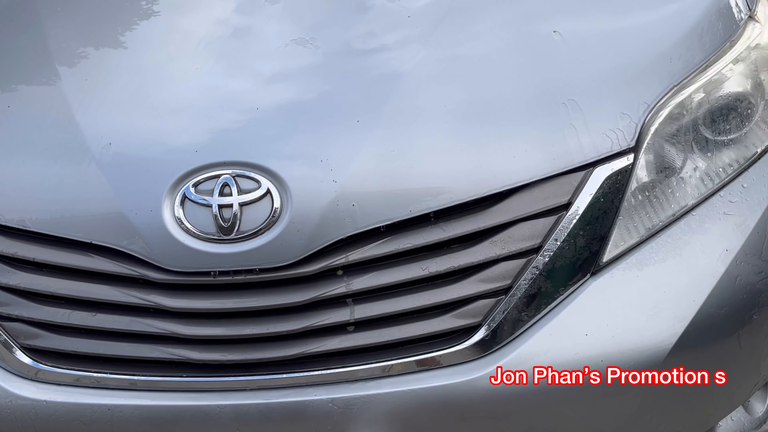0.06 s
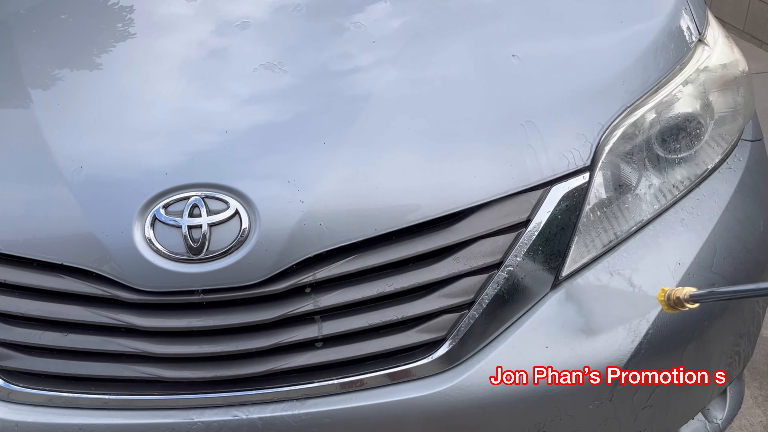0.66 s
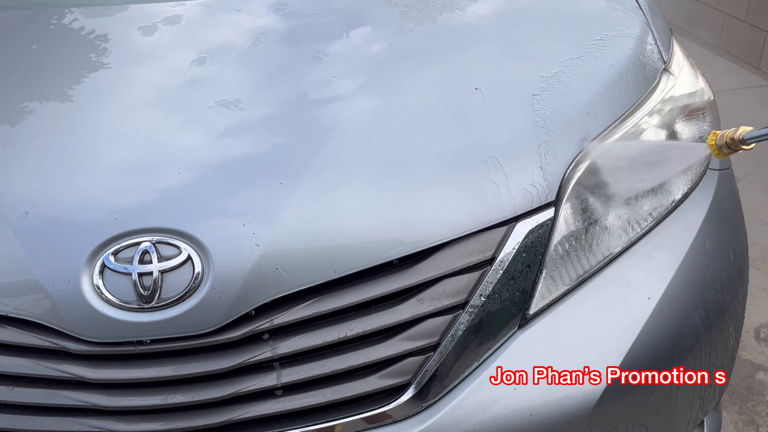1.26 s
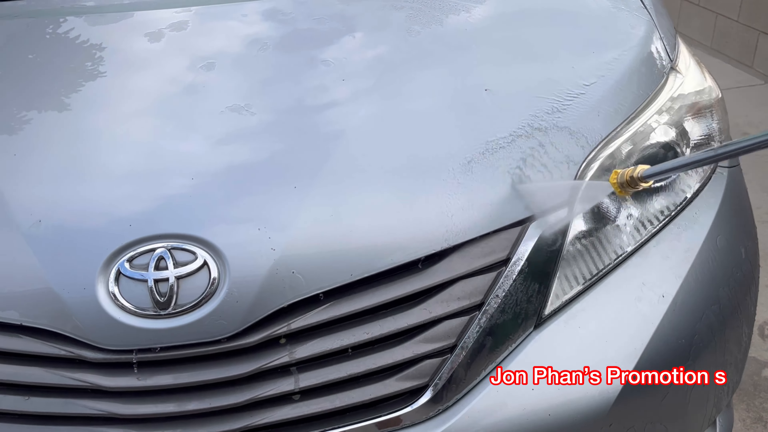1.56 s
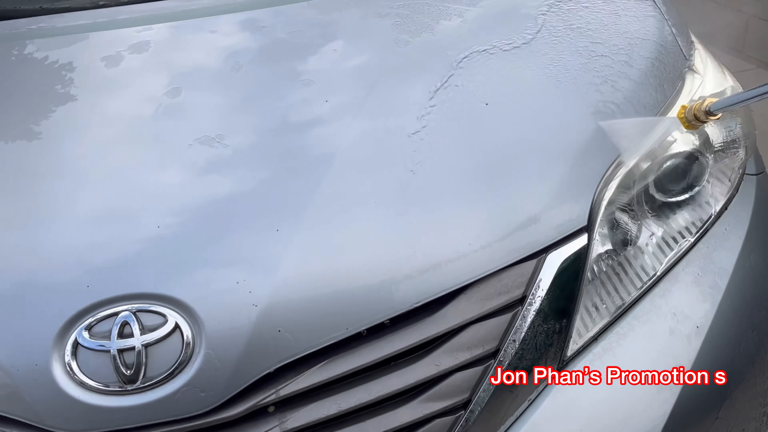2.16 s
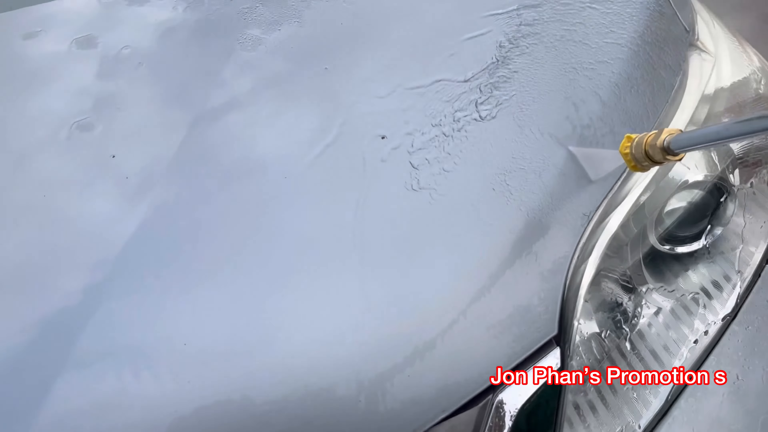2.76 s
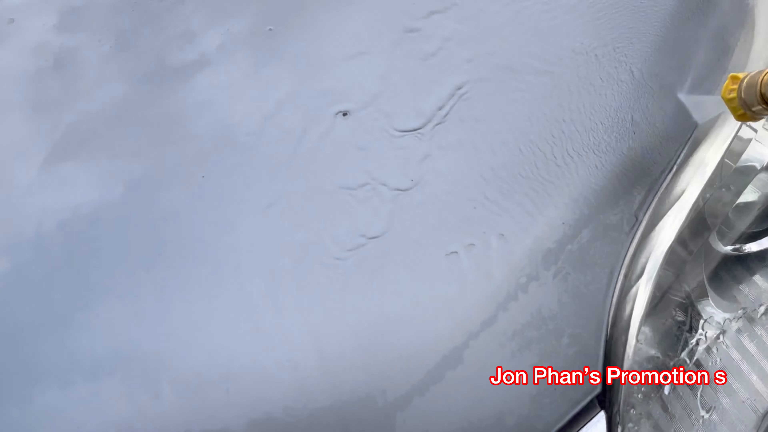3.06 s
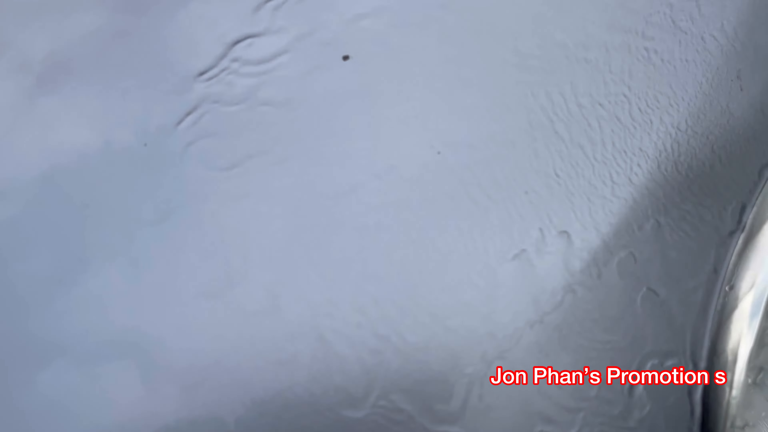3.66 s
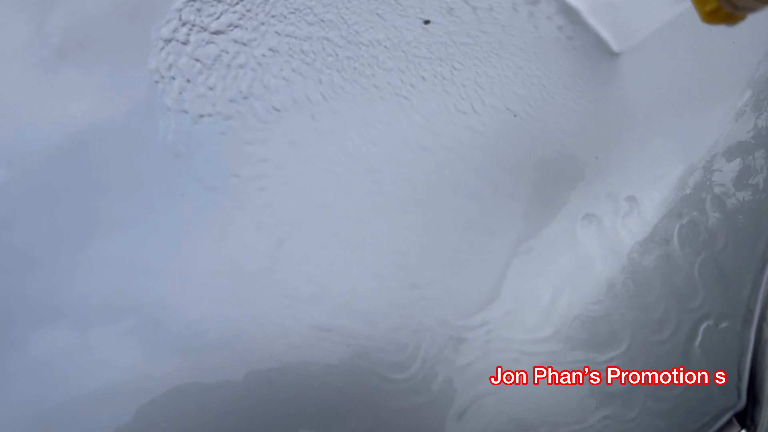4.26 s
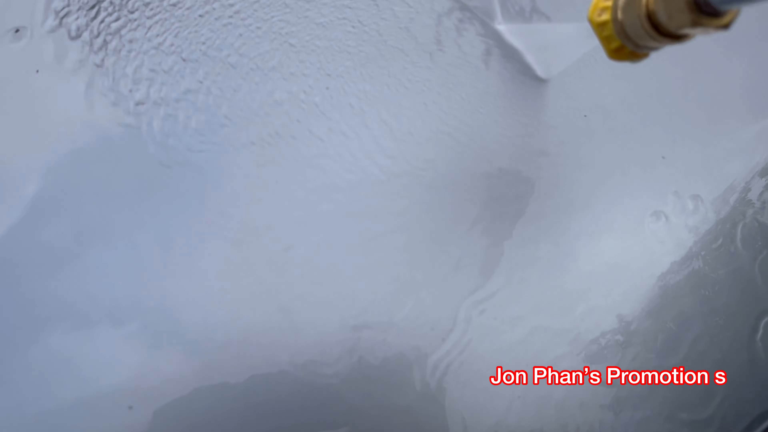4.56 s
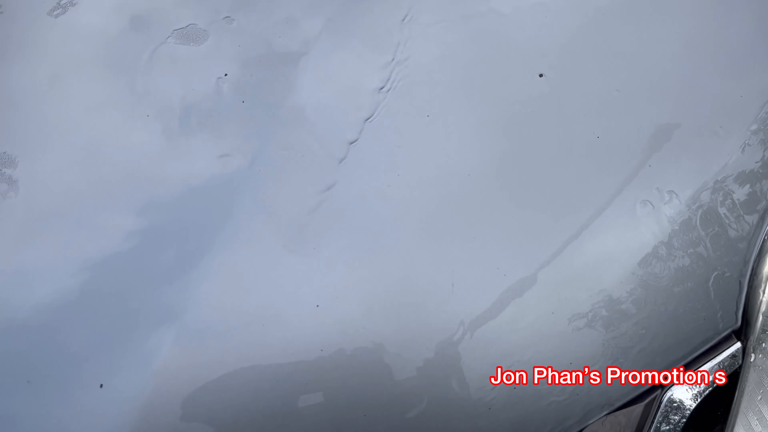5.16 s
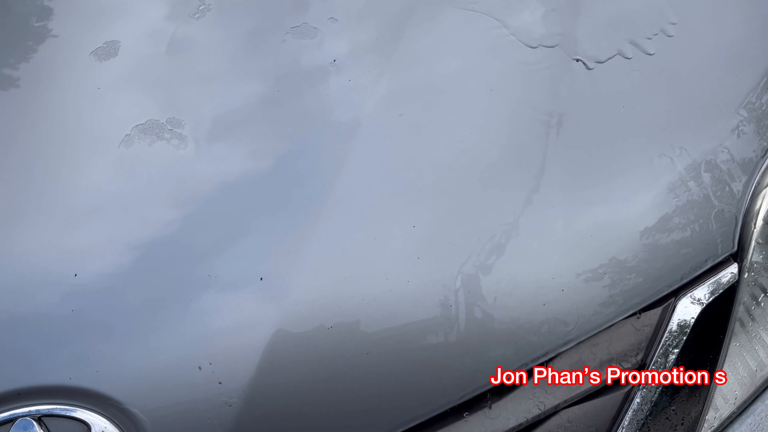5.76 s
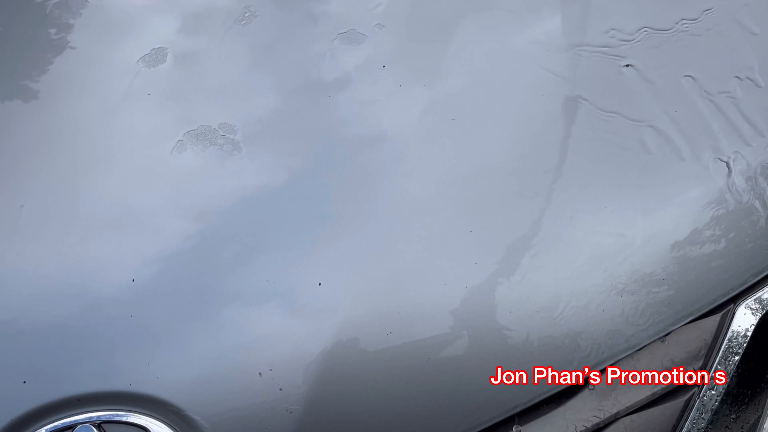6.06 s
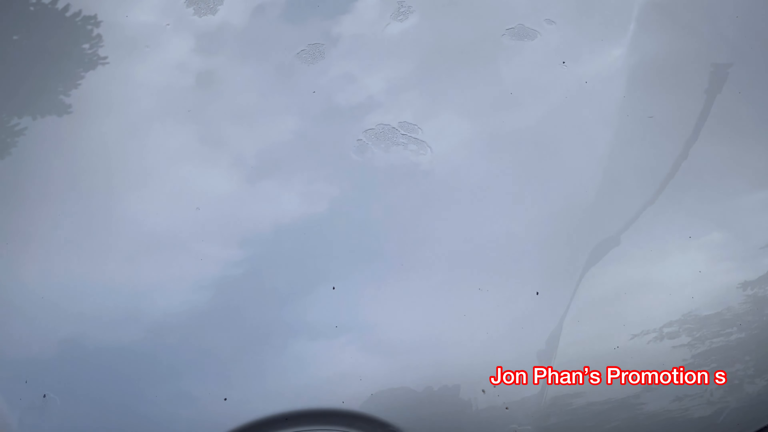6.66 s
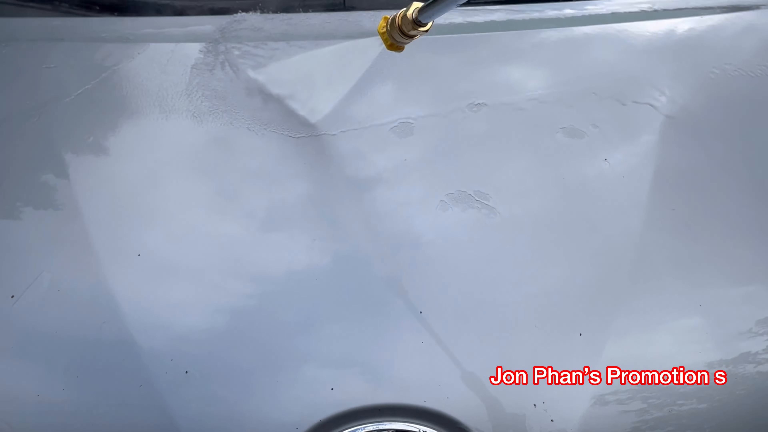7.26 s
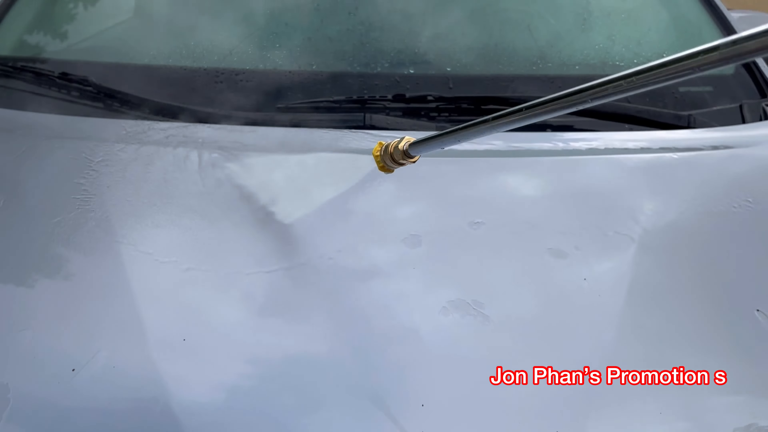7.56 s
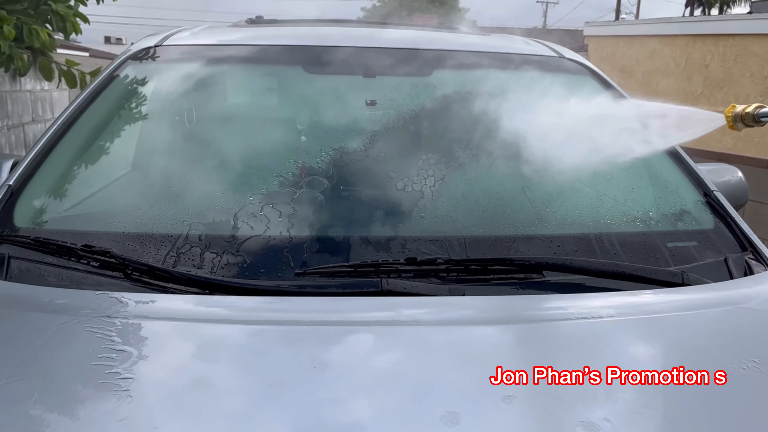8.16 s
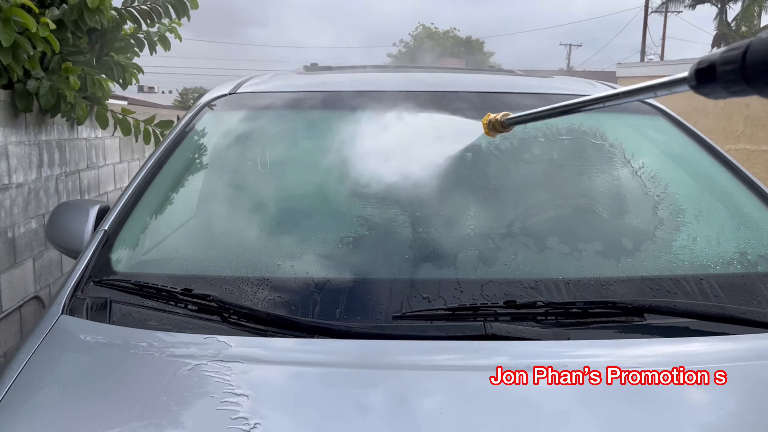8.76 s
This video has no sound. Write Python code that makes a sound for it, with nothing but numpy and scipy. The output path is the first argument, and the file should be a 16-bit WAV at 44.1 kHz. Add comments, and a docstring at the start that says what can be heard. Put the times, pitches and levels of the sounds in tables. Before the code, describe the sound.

Close, hissing water spray sweeps over a car, spattering and rumbling on the bodywork while the pressure washer's motor hums steadily.

```python
"""A pressure washer's jet rinses a car outdoors, sweeping bumper, headlamp, bonnet and windscreen.
The nozzle hisses louder the nearer it comes to a hand-held microphone; the water tears into mist,
spatters on the paint and swishes off rims. Drops drum on each part crossed, and the shell rumbles,
thumps and booms once. A few metres away an electric motor hums, driving a three-piston pump."""
import sys
import numpy as np
from scipy import signal
from scipy.fft import rfft, irfft, next_fast_len
from scipy.io import wavfile
from scipy.ndimage import uniform_filter1d, map_coordinates

SR = 44100
rng = np.random.default_rng(int(sys.argv[2]) if len(sys.argv) > 2 else 0)


def log_audio(samples):
    """Write samples as a 16-bit WAV file to the path given in sys.argv[1]."""
    # one column per channel
    frames = np.atleast_2d(samples).T
    # limit to full scale, then quantise
    limited = np.clip(frames, -1, 1)
    pcm = np.round(limited * 32767).astype(np.int16)
    wavfile.write(sys.argv[1], SR, pcm)


N = 396880

# nozzle to microphone: time_s, distance_m
NOZZLE_DISTANCE = [(0, 0.59), (.75, 0.52), (1.05, 0.64), (2.05, 0.57), (2.52, 0.47), (2.67, 0.37),
                   (4.18, 0.28), (4.73, 0.3), (4.93, 0.53), (6.69, 0.74), (7.05, 0.53), (8.25, 0.95),
                   (9, 1.07)]
# spatter band, brighter the flatter the jet meets the paint: time_s, centre_hz
SPATTER_CENTRE = [(0, 2000), (1.5, 2030), (2.8, 2300), (3.25, 2900), (3.8, 2500), (4.4, 2230), (5.0, 2000),
                  (7.0, 2000), (9, 2354)]
def jet(flutter_db=0.6):
    """The fan of water hisses at the nozzle, tears into mist and bursts on the paint."""
    distance_m, spatter_hz = curve(NOZZLE_DISTANCE), curve(SPATTER_CENTRE)
    airborne = nozzle_hiss(distance_m, flutter_db) + mist(distance_m, 1.99 * spatter_hz, flutter_db)
    on_paint = spatter(spatter_hz, flutter_db)
    airborne = bonnet_echo(airborne, distance_m)
    return panel_reflections(airborne, depth_db=2) + panel_reflections(on_paint, depth_db=2)


# nozzle spectrum: freq_hz, gain_db
HISS_SPECTRUM = [(500, -15.5), (1000, -9.5), (2000, -8), (4000, -11.5), (6300, 0.3), (8300, -2.8),
                 (10000, 2), (11500, 0.9), (15000, 0.1)]
def nozzle_hiss(distance_m, flutter_db, hiss_1m_db=-28.5, fine_1m_db=-51):
    """The hiss falls as 1/distance; its finest top falls faster."""
    hiss = at_ports(drops(per_s=60000), colour(HISS_SPECTRUM))
    hiss *= amp(hiss_1m_db + flutter_db * wobble(18)) / distance_m
    fine = at_ports(drops(per_s=71000), bell(13300, width_oct=0.31))
    return hiss + amp(fine_1m_db) / distance_m ** 2.46 * fine


# mist thrown up, more when the jet glances off: time_s, gain_db
MIST_GAIN = [(0, 9.5), (1.0, 2.5), (2.8, 1.5), (3.7, 3), (4.72, -0.5), (5.0, -4.5), (6.65, 1), (6.95, 0.5),
             (7.45, 3), (7.75, 5.5), (8.151, 0), (8.8, 6.5)]
# mist balance: time_s, left_minus_right_db
MIST_PAN = [(0, 5.5), (2.3, 10), (2.7, 0.5), (7.0, 0), (7.4, 14), (7.8, 0), (8.3, 6), (9, 0)]
def mist(distance_m, centre_hz, flutter_db, base_1m_db=-41.5):
    """Mist sizzles, fainter with distance, and at times leans left."""
    gain = amp(base_1m_db + curve(MIST_GAIN) + flutter_db * wobble(13)) / distance_m
    sizzle = gain * moving_band(drops(per_s=12000), centre_hz, width_oct=0.74)
    pan = amp(np.array([[1], [-1]]) * curve(MIST_PAN) / 2)
    return sizzle * pan / np.sqrt(np.mean(pan ** 2, axis=0))


# spatter before trim: time_s, level_db
SPATTER_LEVEL = [(0, -30.5), (.7, -31), (1.05, -35), (2.0, -32), (2.63, -25.5), (2.72, -30), (3.12, -30),
                 (3.22, -39), (3.5, -35.5), (3.68, -27.5), (4.73, -29.2), (4.95, -32.5), (5.3, -34),
                 (6.8, -34.5), (7.2, -33.5), (8.2, -39), (9, -37)]
def spatter(centre_hz, flutter_db, trim_db=1):
    """Drops burst on the paint in a broad band of noise."""
    gain = amp(trim_db + curve(SPATTER_LEVEL) + flutter_db * wobble(25))
    return gain * moving_band(drops(per_s=7000), centre_hz, width_oct=0.78)


# jet passes: part, start_s, end_s, level_db, growth_db
PART_PASSES = [("grille", -0.12, 0.8, -31.5, 2), ("front", -.1, 0.676, -28, -1.1),
               ("front", 0.674, 1.03, -26, 1), ("lamp", 0.55, 1.21, -34, -1),
               ("front", 1.024, 1.61, -22, .5), ("lamp", 1.2, 1.66, -25.5, -1.8),
               ("front", 1.6, 2.666, -29.5, -.5), ("lamp", 1.66, 2.3, -30.5, 1),
               ("gap", 2.105, 2.68, -25, 1), ("lamp", 2.68, 2.84, -31.5, -3),
               ("bonnet", 3.1, 4.63, -41.5, 2.3), ("bonnet", 4.95, 5.3, -28, -.5),
               ("bonnet", 5.3, 6.76, -26.5, -.5), ("glass", 6.76, 7.15, -30, 0),
               ("bonnet", 6.76, 7.01, -34, 0), ("bonnet", 7.1, 7.62, -29, -1.2),
               ("cowl", 7.62, 7.79, -26.5, 2), ("glass", 7.8, 9.1, -33, .5)]
def jet_on_part(name, edge_s=0.031):
    """The fan slides onto a part, plays steadily harder or softer, and slides off."""
    t = np.arange(N) / SR
    step = lambda at_s: (1 + np.tanh((t - at_s) / (2 * edge_s))) / 2
    gain = np.zeros(N)
    for part, start_s, end_s, level_db, growth_db in PART_PASSES:
        if part == name:
            progress = np.clip((t - start_s) / (end_s - start_s), 0, 1)
            gain += step(start_s) * (1 - step(end_s)) * amp(level_db + growth_db * (progress - .5))
    return gain


# part resonances: centre_hz, width_hz, gain_db
GRILLE_MODES = [(724, 210, -2), (1300, 240, -7.5)]
FRONT_MODES = [(200, 125, -1.6), (297, 47, 1), (430, 140, -1.5), (500, 280, -0.6)]
LAMP_MODES = [(1174, 120, 0.5), (1390, 240, -0.5), (1970, 500, -4), (2200, 200, -9)]
GAP_MODES = [(1090, 170, -0.5), (1500, 85, 0), (2030, 100, 2.5), (2500, 500, -5)]
BONNET_MODES = [(195, 94, 1.5), (255, 130, 0.5), (380, 74, 2.5), (640, 480, 1), (950, 360, -10),
                (1400, 220, -2)]
GLASS_MODES = [(261, 210, 2.5), (530, 1100, -3), (946, 120, 2.5), (1500, 140, 0), (2690, 1300, -11)]
COWL_MODES = [(135, 70, 3), (270, 90, 0), (400, 180, -4), (1100, 800, -14)]
def drumming(flutter_db=0.28):
    """Each part that the jet crosses rings with its own resonances."""
    def ring(part, modes, drops_per_s, skirt_hz):
        return jet_on_part(part) * at_ports(drops(drops_per_s), resonances(modes, skirt_hz))
    parts = (ring("grille", GRILLE_MODES, drops_per_s=7800, skirt_hz=2000)
             + ring("front", FRONT_MODES, drops_per_s=8000, skirt_hz=880)
             + ring("lamp", LAMP_MODES, drops_per_s=5100, skirt_hz=3300)
             + ring("gap", GAP_MODES, drops_per_s=9700, skirt_hz=3580)
             + ring("bonnet", BONNET_MODES, drops_per_s=7800, skirt_hz=2220)
             + ring("glass", GLASS_MODES, drops_per_s=8700, skirt_hz=4000)
             + ring("cowl", COWL_MODES, drops_per_s=5000, skirt_hz=2200))
    return amp(flutter_db * wobble(10)) * panel_reflections(parts, depth_db=1.43)


# rims and seams caught, and in the 13-15 kHz rows the nozzle's hissing beam sweeping across the microphone:
# time_s, level_db, centre_hz, width_oct, half_length_s
SWISH_EVENTS = [(0.06, -36, 3000, 0.77, 0.17), (.59, -26, 3640, 0.52, 0.12), (0.602, -30, 2000, 0.32, 0.1),
                (.73, -27.5, 1500, 0.88, 0.069), (1.329, -26, 1760, 0.87, 0.05), (1.503, -26, 3300, 1, 0.2),
                (1.7, -27, 14500, 0.25, .11), (2.33, -24, 13500, 0.96, 0.1), (2.609, -30, 2400, 0.16, 0.075),
                (3.108, -25, 6240, 0.4, 0.12), (3.548, -23, 6540, 0.55, 0.15), (3.788, -31, 2500, 0.2, 0.17),
                (4.105, -31, 2680, 0.31, 0.13), (4.4, -34.5, 1350, 0.71, 0.15), (4.959, -29, 1000, 1, 0.13),
                (7.7, -35.5, 950, 0.56, 0.13)]
def swishes():
    """Water bursts off a rim as the jet flicks across it, and the nozzle's beam flicks past the microphone in a
    bright hiss."""
    return sum(burst(time_s, level_db, half_length_s, bell(centre_hz, width_oct))
               for time_s, level_db, centre_hz, width_oct, half_length_s in SWISH_EVENTS)


# shell rumble, strongest with the jet on the broad bonnet: time_s, level_db
RUMBLE_LEVEL = [(0, -45), (2.55, -40.5), (2.85, -54), (3.1, -36), (3.8, -37), (4.85, -45), (5.6, -37.5),
                (6.8, -57), (7.2, -38), (8.1, -54), (9, -41)]
# rumble spectrum: freq_hz, gain_db
RUMBLE_SPECTRUM = [(20, -32), (30, -20), (42, -18), (62, 1), (85, -3.5), (120, -8.5), (200, -5.5),
                   (400, -12.5), (1000, -66)]
def shell_rumble(swell_db=0.5):
    """The car's body rumbles under the water."""
    gain = amp(curve(RUMBLE_LEVEL) + swell_db * wobble(7.9))
    return gain * at_ports(rng.standard_normal((2, N)), colour(RUMBLE_SPECTRUM))


# hollows struck: time_s, level_db, centre_hz, half_length_s
HOLLOW_THUMPS = [(0.251, -34.5, 110, .12), (1.111, -29, 88, 0.07), (1.23, -26, 200, 0.098),
                 (1.53, -26, 330, 0.06), (1.379, -36, 75, .12), (1.563, -30.5, 85, 0.066),
                 (3.5, -35, 130, 0.058), (5.051, -29, 400, .055), (5.37, -31, 210, .08),
                 (7.42, -32, 210, 0.21)]
def thumps(width_ratio=0.89):
    """The jet briefly excites one broad resonance of a hollow part."""
    return sum(burst(time_s, level_db, half_length_s, resonances([(hz, width_ratio * hz, 0)], 2 * hz))
               for time_s, level_db, hz, half_length_s in HOLLOW_THUMPS)


# hollow cowl under the wipers: pitch_hz, gain_db, t60_s
BOOM_MODES = [(72, -8, .25), (111, 0, .22), (139.5, -1, .2)]
def cowl_boom(start_s=7.69, gain_db=-15, attack_s=.02):
    """One soft push of water sets the cowl's low resonances ringing."""
    t = np.maximum(np.arange(N) / SR - start_s, 0)
    ring = sum(amp(db - 60 * t / t60_s) * np.sin(2 * np.pi * hz * t) for hz, db, t60_s in BOOM_MODES)
    return amp(gain_db) * (1 - np.exp(-t / attack_s)) * ring


def shaft_angle(shaft_hz=54.92, drift=0.000623):
    """The induction motor holds its speed almost exactly under the pump's load."""
    speed_hz = shaft_hz * (1 + drift * wobble(3))
    return 2 * np.pi * np.cumsum(speed_hz) / SR


# piston strokes, their two overtones, motor whine: shaft_order
TONE_ORDERS = (3, 6, 9, 62)
# direction of each: left_lead_rad
TONE_LEADS = [0, .2, 1.1, 1.3]
# swell of each as the microphone moves around the car: time_s, level_db
STROKE_LEVEL = [(.25, -33.5), (.75, -38.5), (1.5, -40.5), (2.4, -41.5), (3.85, -44.5), (4.8, -42.5),
                (5.15, -36), (7.3, -36), (9, -36.5)]
SECOND_HARMONIC_LEVEL = [(0, -45), (.8, -43), (2.0, -58), (3.3, -43.5), (3.95, -45.5), (4.3, -32.5),
                         (4.82, -36.5), (4.97, -44), (7.4, -44.5), (8.1, -42), (9, -40.5)]
THIRD_HARMONIC_LEVEL = [(0, -46), (1.3, -35.5), (2.699, -42), (4.0, -41.5), (4.7, -46), (6.3, -45),
                        (7.3, -48.5), (8.0, -40), (9, -38)]
WHINE_LEVEL = [(0, -45), (2.3, -39.5), (3.2, -62), (5.2, -54), (6.35, -43.5), (6.6, -58), (7.0, -41),
               (7.8, -53), (8.5, -46.5), (9, -41)]
# weak motor tones: shaft_order, level_db
WEAK_TONES = [(4, -52), (5, -51), (7, -51), (8, -60.5), (10, -58.5), (11, -59), (12, -54), (15, -66),
              (17, -57.5), (19, -67), (28, -57)]
# cooling fan spectrum: freq_hz, gain_db
FAN_SPECTRUM = [(30, -20), (100, 6), (200, 2), (280, 2), (400, 2), (520, 2), (700, -5), (1500, -19),
                (4000, -39), (12000, -58)]
def motor(shaft_rad, fan_db=-40, waver_db=.7):
    """Piston strokes, weaker shaft orders and a thin whine waver over the rush of the cooling fan."""
    def tone(order, level_db, lead_rad):
        phase = order * shaft_rad + rng.uniform(0, 2 * np.pi) + np.array([[lead_rad], [-lead_rad]]) / 2
        return np.sqrt(2) * amp(level_db + waver_db * wobble(8.3)) * np.sin(phase)
    levels = (STROKE_LEVEL, SECOND_HARMONIC_LEVEL, THIRD_HARMONIC_LEVEL, WHINE_LEVEL)
    strong = sum(tone(order, curve(level), lead_rad)
                 for order, level, lead_rad in zip(TONE_ORDERS, levels, TONE_LEADS))
    weak = sum(tone(order, level_db, 0) for order, level_db in WEAK_TONES)
    fan = amp(fan_db) * at_ports(rng.standard_normal((2, N)), colour(FAN_SPECTRUM))
    return strong + weak + fan


def bonnet_echo(x, distance_m, strength=0.15, reach_m=0.76, ms_per_m=6.9):
    """The wet bonnet mirrors a close nozzle: a short, moving echo combs the hiss."""
    delayed_index = np.arange(N) - ms_per_m * distance_m * SR / 1000
    share = strength * np.exp(-(distance_m / reach_m) ** 2 / 2)
    echo = np.array([map_coordinates(channel, [delayed_index]) for channel in x])
    return (x - share * echo) / np.sqrt(1 + share ** 2)


def panel_reflections(x, depth_db):
    """Reflections off the curved panels favour ever new frequencies as the wand moves."""
    spectra = signal.stft(x, nperseg=1024)[2]
    patches = uniform_filter1d(rng.standard_normal(spectra.shape[1:]), size=3, axis=0)
    patches = uniform_filter1d(patches, size=30, axis=1)
    return signal.istft(spectra * amp(depth_db * unit(patches)), nperseg=1024)[1][:, :N]


# phase between the microphone ports: freq_hz, left_lead_rad
PORT_LEAD = [(250, 0), (600, .45), (1500, -1.2), (1850, 0), (2300, .05), (3100, .5), (4000, .1),
             (4900, .15), (5500, -1.1), (6500, -1.3), (7400, -2.5), (8250, -3.14), (9000, -3.8),
             (11800, -6.28), (15500, -9.4)]
# likeness of the ports: freq_hz, coherence
PORT_COHERENCE = [(60, .97), (300, .92), (700, .55), (1400, .62), (2000, .96), (2600, .93), (3300, .78),
                  (4300, .8), (5200, .62), (7000, .82), (8250, .93), (10000, .84), (11800, .95),
                  (14000, .85)]
# port balance: freq_hz, left_minus_right_db
PORT_BALANCE = [(1000, -.6), (2000, .3), (3400, .6), (5200, 0), (6500, 1), (9000, 0)]
def at_ports(pair, response):
    """A shared and an unshared stream, coloured and brought to the two ports at rms 1."""
    n = pair.shape[1]
    n_fft = next_fast_len(n, True)
    hz = np.fft.rfftfreq(n_fft, 1 / SR)
    mix_rad = np.arccos(np.clip(along(PORT_COHERENCE, hz), 0, 1)) / 2
    shared, apart = rfft(pair, n_fft) * response(hz) * np.array([np.cos(mix_rad), np.sin(mix_rad)])
    # each port takes half of the difference
    left = amp(along(PORT_BALANCE, hz) / 2) * np.exp(1j * along(PORT_LEAD, hz) / 2)
    spectra = np.array([(shared + apart) * left, (shared - apart) / left])
    return unit(irfft(spectra, n_fft)[:, :n])


def drops(per_s, cluster_size=20):
    """Two streams of noise, roughened by chance clusters of drops."""
    density = np.maximum(1 + wobble(per_s / cluster_size) / np.sqrt(cluster_size), 0)
    return rng.standard_normal((2, N)) * np.sqrt(density)


def moving_band(pair, centre_hz, width_oct):
    """A broad resonance at the ports whose centre moves while its level stays."""
    hz, t, spectra = signal.stft(at_ports(pair, np.ones_like), SR, nperseg=512)
    gain = bell(np.interp(t, np.arange(N) / SR, centre_hz), width_oct)(hz[:, None])
    gain /= np.linalg.norm(gain, axis=0)
    return unit(signal.istft(spectra * gain, nperseg=512)[1][:, :N])


def burst(time_s, level_db, half_length_s, response):
    """Coloured noise that swells and fades around time_s."""
    t = np.arange(SR) / SR - .5
    envelope = amp(level_db) * np.exp(-(t / half_length_s) ** 2)
    padded = np.zeros((2, N + 2 * SR))
    padded[:, round(time_s * SR):][:, :SR] = envelope * at_ports(rng.standard_normal((2, SR)), response)
    return padded[:, SR // 2:][:, :N]


def resonances(modes, skirt_hz):
    """Response of independently struck modes, falling away above the skirt."""
    def response(hz):
        power = sum(amp(db) ** 2 * (hz * width) ** 2 / ((centre ** 2 - hz ** 2) ** 2 + (hz * width) ** 2)
                    for centre, width, db in modes)
        return np.sqrt(power) / (1 + (hz / skirt_hz) ** 4)
    return response


def bell(centre_hz, width_oct):
    """Response of one broad resonance, down to 1/e at width_oct either side."""
    return lambda hz: np.exp(-(np.log2((hz + 1) / centre_hz) / width_oct) ** 2)


def colour(spectrum):
    """Response of (freq_hz, gain_db) points."""
    return lambda hz: amp(along(spectrum, hz))


def along(points, hz):
    """(freq_hz, value) points read on a log axis."""
    freq_hz, values = np.transpose(points)
    return np.interp(np.log(hz + 1), np.log(freq_hz), values)


def curve(points):
    """(time_s, value) points read at every sample."""
    return np.interp(np.arange(N) / SR, *np.transpose(points))


def wobble(knots_per_s):
    """A smooth random curve."""
    knots = rng.standard_normal(int(N * knots_per_s / SR) + 4)
    coarse = np.arange(0, N, 16)
    return np.interp(np.arange(N), coarse, map_coordinates(knots, [coarse * knots_per_s / SR]))


def amp(db):
    """Decibels to gain."""
    return 10 ** (np.asarray(db) / 20)


def unit(x):
    """x at rms 1."""
    return x / np.sqrt(np.mean(x ** 2) + 1e-20)


def scene(ripple=.015):
    """Water over the motor's hum; three piston strokes a turn ripple the pressure."""
    shaft_rad = shaft_angle()
    hum = motor(shaft_rad)
    pressure = 1 + ripple * np.sin(TONE_ORDERS[0] * shaft_rad)
    water = jet() + swishes() + drumming() + shell_rumble() + thumps() + cowl_boom()
    return pressure * water + hum


def record(dry, bass_hz=41, top_hz=15500):
    """The microphone thins the lowest bass and keeps nothing above its band limit."""
    n_fft = next_fast_len(N + SR // 2)
    hz = np.fft.rfftfreq(n_fft, 1 / SR)
    response = (hz < top_hz) / np.sqrt(1 + (bass_hz / (hz + 1)) ** 8)
    return irfft(rfft(dry, n_fft) * response, n_fft)[..., :N]


dry = scene()
out = record(dry)
log_audio(out)
```